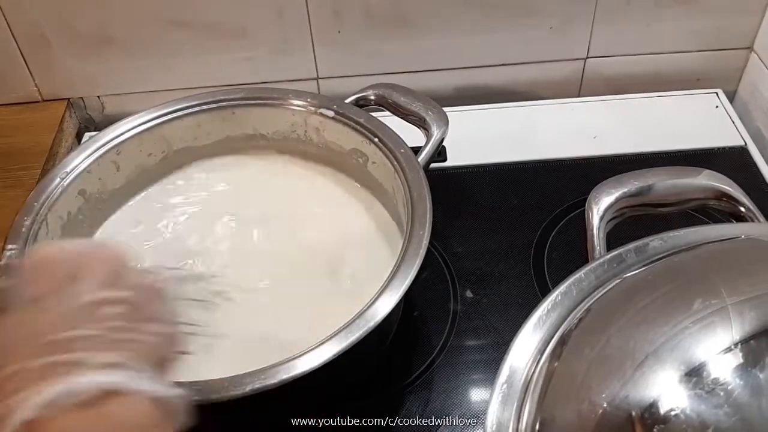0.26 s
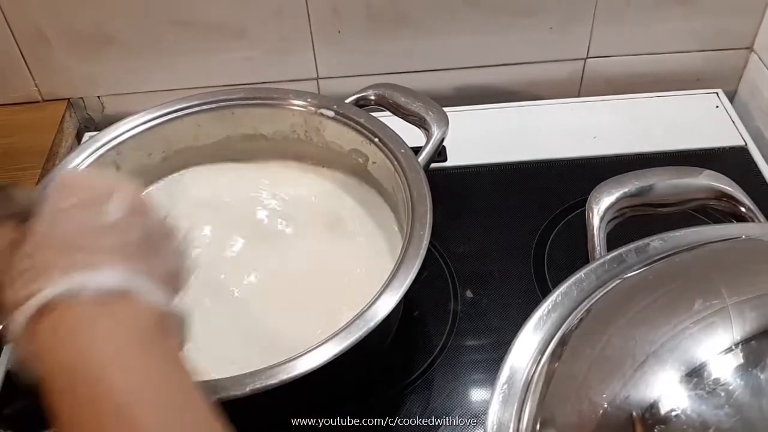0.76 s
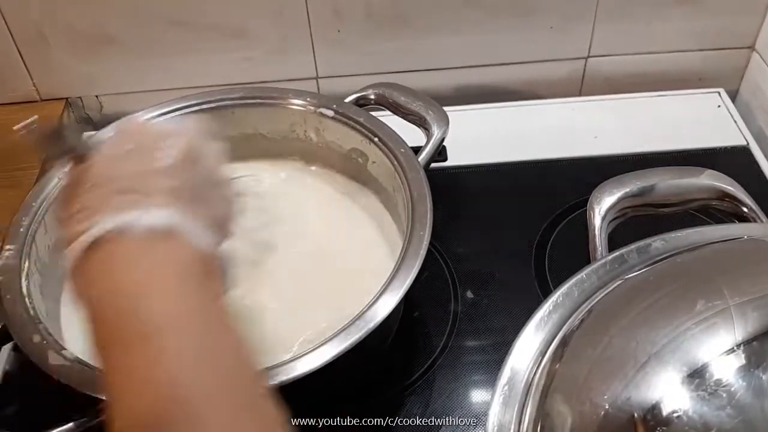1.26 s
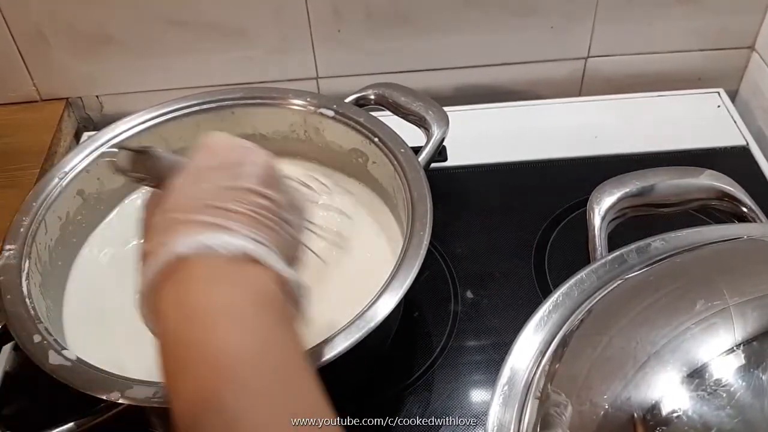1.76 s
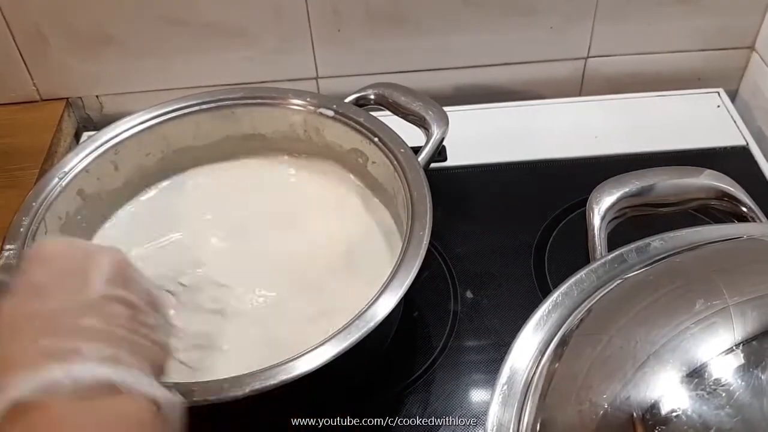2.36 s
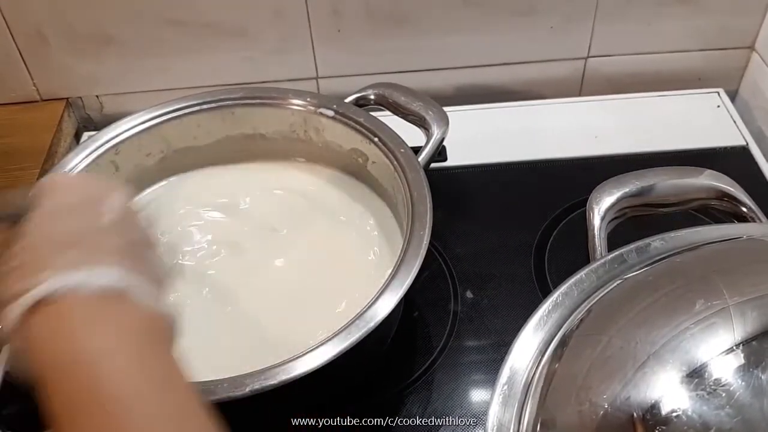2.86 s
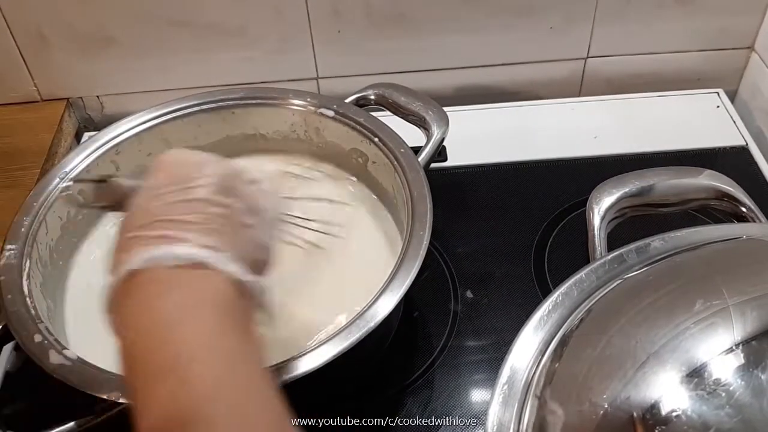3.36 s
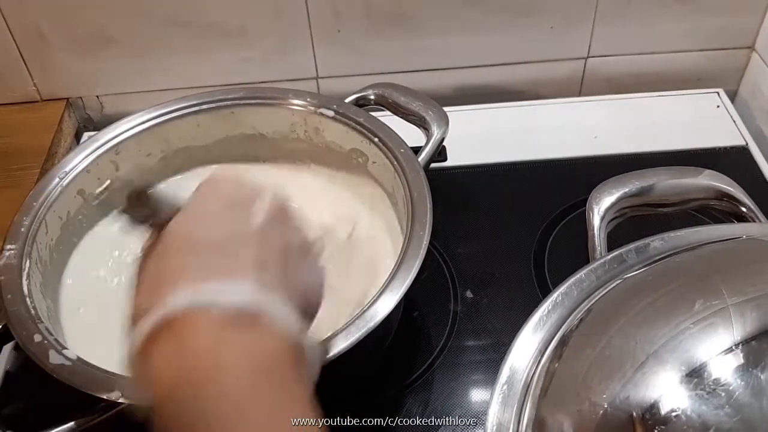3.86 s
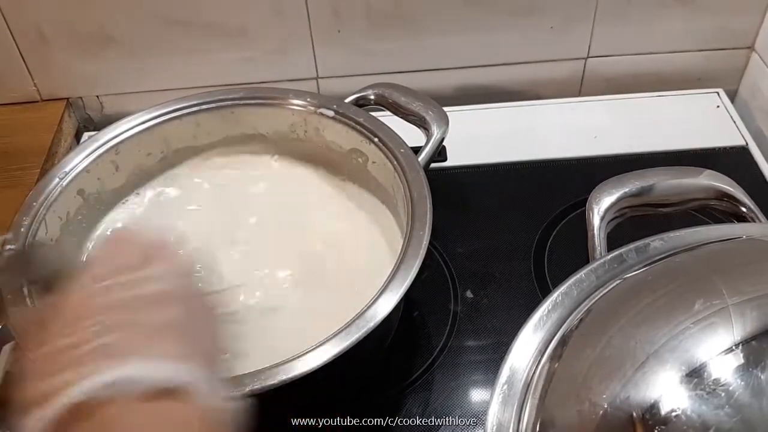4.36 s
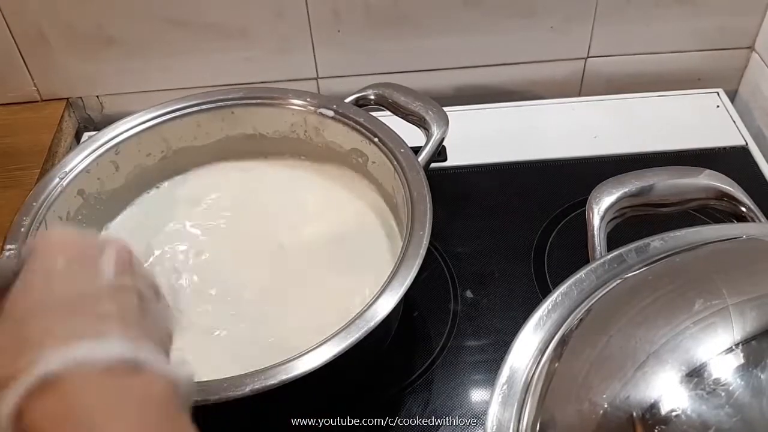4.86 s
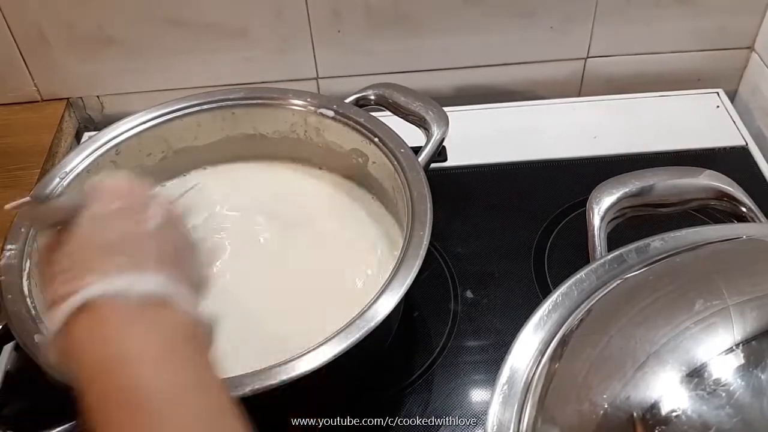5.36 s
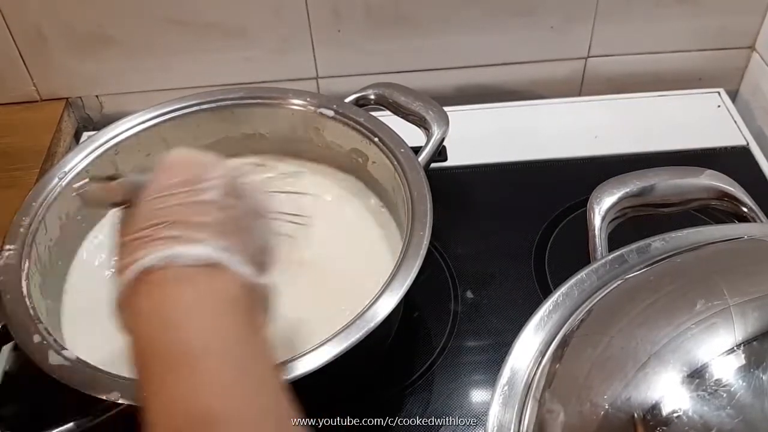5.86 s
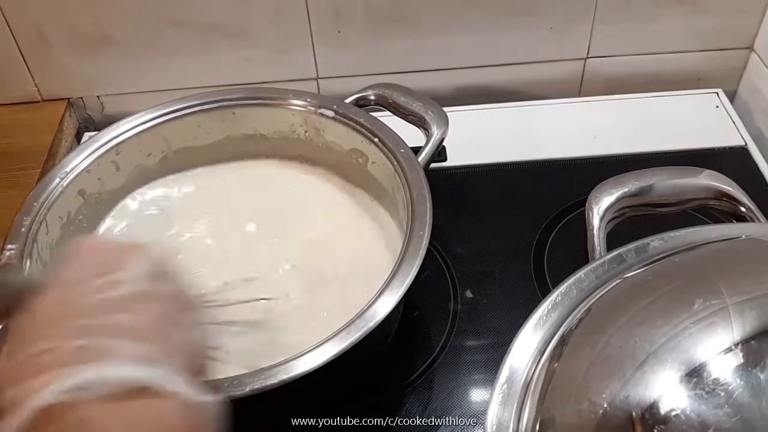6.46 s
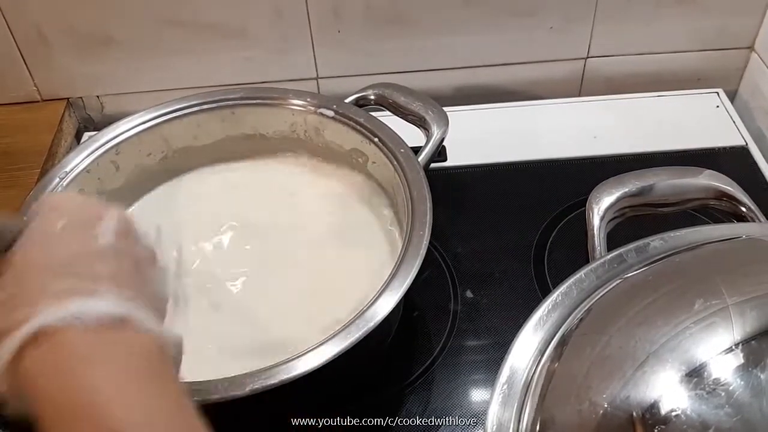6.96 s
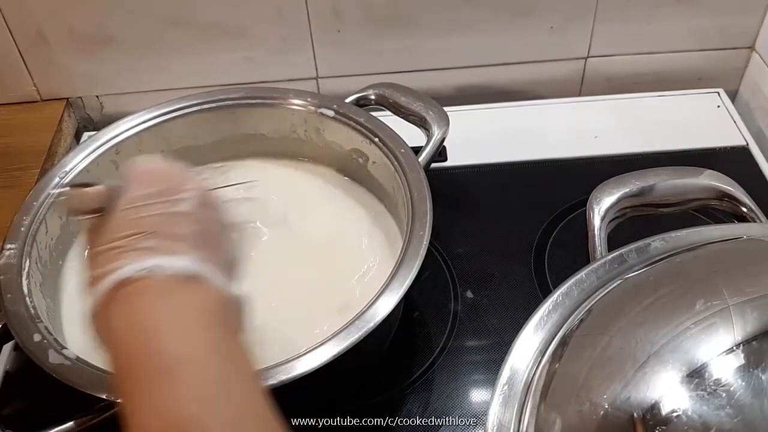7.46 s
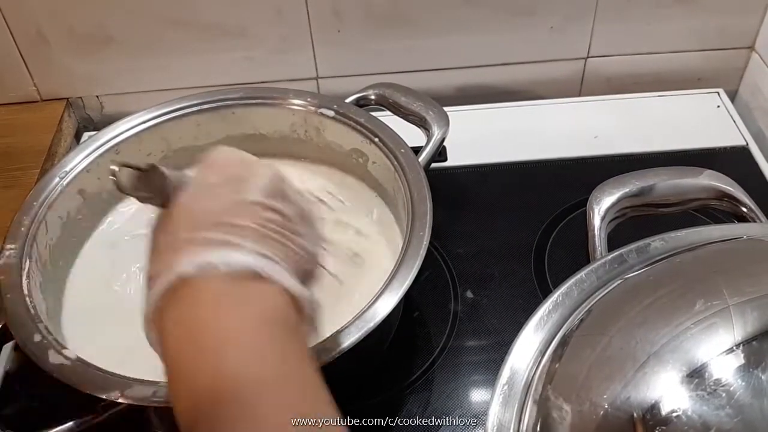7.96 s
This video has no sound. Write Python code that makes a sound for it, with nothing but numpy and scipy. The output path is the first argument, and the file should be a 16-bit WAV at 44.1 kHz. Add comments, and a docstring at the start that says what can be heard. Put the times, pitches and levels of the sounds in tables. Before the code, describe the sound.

A wire whisk circles fast in a steel pot of thick sauce, scraping with a bright metallic rasp, small squeaks, occasional clashes and wet plops.

```python
"""Kitchen hob: a wire whisk circles through thick sauce in a steel pot, about twice a second.
The wires grind along the steel (trains of slips through wire and pot modes), flick free, squeak where they
stick and slip (wavering tones), and now and then clash against the wall (bursts of strikes).
The sauce churns, plops and slaps (filtered noise grains and short tones); the hob booms now and then.
A low rumble, a hum and the reflections of the tiled corner surround it."""
import sys
import numpy as np
from scipy import signal
from scipy.fft import rfft, irfft
from scipy.io import wavfile
from scipy.ndimage import uniform_filter1d

SR = 44100
rng = np.random.default_rng(int(sys.argv[2]) if len(sys.argv) > 2 else 0)


def store_pcm(level_fs):
    """Save levels as 16-bit WAV."""
    pcm = np.round(np.clip(level_fs, -1, 1) * 32767).astype(np.int16)
    wavfile.write(sys.argv[1], SR, np.atleast_2d(pcm).T)


N = 362502
T = np.arange(N) / SR
HAND_T = T[::64]  # coarse clock for slow envelopes


def from_db(db):
    """Decibels to gain."""
    return 10 ** (np.asarray(db) / 20)


def unit(x):
    """Scales to rms 1."""
    return x / np.sqrt(np.mean(x ** 2) + 1e-20)


def read(points, hz):
    """Reads a table along a logarithmic frequency axis."""
    f, value = np.transpose(points)
    return np.interp(np.log(hz + 1), np.log(f + 1), value)


def add(mix, s, sound):
    """Mixes a sound in at time s."""
    part = mix[..., max(round(s * SR), 0):][..., :sound.shape[-1]]
    part += sound[..., :part.shape[-1]]


def through(x, response):
    """Passes a sound through an impulse response."""
    return signal.fftconvolve(np.atleast_2d(x), np.atleast_2d(response), axes=1)[:, :x.shape[-1]]


def wander(rate_hz):
    """A random curve of rms 1 through rate_hz knots a second."""
    knots = rng.standard_normal(2048)
    return unit(np.interp(T * rate_hz, np.arange(len(knots)), knots))


def click(points, modes=(), size=4096):
    """A minimum-phase click of energy 1: a broad colour with resonances on top."""
    hz = np.fft.rfftfreq(size, 1 / SR)
    power = from_db(read(points, hz)) ** 2
    for f, width, db in modes:
        power = power + from_db(db) ** 2 / (1 + ((hz - f) / width) ** 2) ** 2
    cepstrum = irfft(np.log(power) / 2)
    # folding the cepstrum makes the click causal
    cepstrum[1:size // 2] *= 2
    cepstrum[size // 2 + 1:] = 0
    response = irfft(np.exp(rfft(cepstrum)))
    return response / np.linalg.norm(response)


def slips(per_s, spread_db, size):
    """A train of tiny slips at random times, of random sign and exponentially spread level; rms 1."""
    strength = from_db(spread_db * np.minimum(rng.exponential(1, size), 4))
    sign = rng.choice([-1, 1], size)
    happens = rng.random(size) < per_s / SR
    return unit(strength * sign * happens)


def bounces(echo, span_s=.007, count=14):
    """Paths from one spot in the pot to the two channels: direct, then bounces between the steel walls."""
    paths = np.zeros((2, 1024))
    for side in paths:
        delay = rng.random(count)
        side[rng.integers(0, 16)] = 1
        at = np.minimum(16 + delay * span_s * SR, len(side) - 1).astype(int)
        side[at] += echo * rng.choice([-1, 1], count) * np.exp(-delay)
    return paths / np.linalg.norm(paths, axis=1, keepdims=True)


# Colour of the kitchen's low rumble. Each row: frequency in Hz, level in dB.
RUMBLE_COLOUR = [(20, -30), (40, -12.5), (62, -4.5), (85, 0), (115, -5.5), (160, -14.5), (215, -26),
                 (320, -15), (500, -42.5), (2000, -61), (16000, -55)]


def background():
    """Low rumble (coloured noise, partly shared by the channels) and mains hum of the kitchen."""
    air = rng.standard_normal((2, N))
    noise = through(air + 0.49 * air[::-1], click(RUMBLE_COLOUR))
    rumble = unit(noise * from_db(0.43 * wander(rate_hz=12)))
    hum = unit(np.sin(2 * np.pi * 100.5 * T + 0.33 * wander(rate_hz=4.0)))
    return from_db(-56.5) * rumble + from_db(-64.5) * hum


# Modes of the filled pot. Each row: frequency in Hz, free t60 in seconds, relative level in dB.
POT_MODES = [(1100, 0.3, 5.5), (1235, 0.19, 6), (1268, 0.4, -3.5), (1378, 0.2, 4), (1630, 0.35, 0.5),
             (1835, 0.39, 2), (1910, 0.26, 0.5), (1960, 0.17, 2), (2100, 0.25, 6), (2154, 0.34, -4),
             (2313, 0.4, 7.5), (2550, 0.23, 6.5), (2716, 0.28, 12), (3180, 0.21, 10), (3320, 0.23, 7),
             (3450, 0.12, 5), (3780, 0.11, 8.5), (3840, 0.089, 1)]
PRESSED_RING_SHARE = 0.45  # wires lying on the wall damp it: share of the free t60 left


def pot_modes(ring_share):
    """The dying wave of each pot mode; it swells while the blow travels round the wall."""
    t = np.arange(SR // 2) / SR
    swell = (1 - np.exp(-t / 0.00094)) ** 2
    waves = []
    for hz, t60, db in POT_MODES:
        decay = from_db(db - 60 * t / (t60 * ring_share)) / np.sqrt(t60)
        waves.append(decay * np.exp(2j * np.pi * hz * t))
    return swell * np.array(waves)


# Colour of a knock on the wall. Each row: frequency in Hz, level in dB.
WALL_COLOUR = [(500, -45), (640, -10), (850, -24), (1010, -13), (1110, -4.5), (1220, 0.5), (1370, -5),
               (1510, 2), (1680, 3.5), (1830, -0.5), (2200, 0.5), (2390, -36), (2650, -20), (3200, -24),
               (6000, -27)]


def pot_ring(pot, spread_db, ring_db, knock_db):
    """The pot's answer to a blow at a new spot: a knock of the wall and a fresh mix of its modes."""
    phase = np.exp(2j * np.pi * rng.random((2, len(POT_MODES))))
    left, right = phase * from_db(spread_db * rng.standard_normal(len(POT_MODES)))
    ring = (np.array([left, right - 0.35 * left]) @ pot).imag  # opposite sides swing against each other
    ring *= from_db(ring_db) * np.sqrt(2) / np.linalg.norm(ring)
    knock = through(click(WALL_COLOUR, size=2048), bounces(echo=1.0, span_s=.004))
    add(ring, 0, from_db(knock_db) * knock)
    return ring


def touch(modes, spread_db, detune):
    """Wire modes for one touch: the point of contact favours some, and bending detunes them."""
    hz, width, db = np.transpose(modes)
    pull, luck = rng.standard_normal((2, len(hz)))
    return zip(hz * (1 + detune * pull), width, db + spread_db * luck)


PUSH_POINT = 1.54  # top of a push: 1 sharp, 2 round


def push(s, rise, fall):
    """The force of one push of the whisk: it builds, peaks at time s and lets go."""
    u = HAND_T - s
    return np.exp(-np.minimum(np.abs(u / np.where(u < 0, rise, fall)) ** PUSH_POINT, 20))


# The cage pressed along the steel, several overlapping pushes a circle. Each row: time of greatest force in
# seconds, rise in seconds, fall in seconds, level in dB, bite (rasp) relative in dB, wall drone relative in dB.
SWEEPS = [(0.068, 0.26, 0.17, -30, -1.5, -21.5), (0.317, 0.052, 0.04, -26, -2.5, -28),
          (0.491, 0.23, 0.051, -28, -1.5, -18.5), (0.679, 0.16, 0.022, -32.5, 2, -17.5),
          (0.899, 0.2, 0.099, -29.5, -0.5, -17.5), (1.024, 0.047, 0.12, -38.5, 3, -32),
          (1.239, 0.2, 0.072, -38, 5.5, -10), (1.334, 0.15, 0.03, -32, -4, -24),
          (1.516, 0.061, 0.044, -33, -3, -25), (1.678, 0.091, 0.035, -33, -4, -15.5),
          (1.73, 0.11, 0.1, -30, -0.5, -21.5), (1.947, 0.12, 0.04, -30.5, -0.5, -20),
          (2.134, 0.15, 0.073, -29, -7, -23), (2.191, 0.26, 0.19, -43, 8, -10.5),
          (2.392, 0.28, 0.019, -34.5, -6.5, -18), (2.565, 0.19, 0.069, -27, -4, -20),
          (2.7, 0.054, 0.22, -31.5, 1, -16.5), (2.85, 0.072, 0.1, -30.5, 2.5, -13.5),
          (2.998, 0.043, 0.16, -32, -5, -31), (3.222, 0.29, 0.028, -48.5, 6.5, -4.5),
          (3.393, 0.045, 0.28, -43.5, 4.5, -16), (3.397, 0.13, 0.01, -28, -2, -16.5),
          (3.696, 0.087, 0.14, -28.5, -4.5, -22), (3.76, 0.054, 0.075, -39.5, 11, -8),
          (3.95, 0.041, 0.066, -37.5, 5, -8), (4.113, 0.063, 0.62, -32.5, -2, -20.5),
          (4.242, 0.022, 0.051, -37.5, 2.5, -12.5), (4.419, 0.068, 0.039, -30.5, 0, -19),
          (4.57, 0.27, 0.026, -35, -1.5, -8), (4.651, 0.088, 0.038, -32, -2, -15.5),
          (4.922, 0.29, 0.18, -33, -2.5, -18), (5.031, 0.041, 0.077, -27.5, -1.0, -15),
          (5.272, 0.3, 0.041, -32.5, -1.5, -18), (5.445, 0.18, 0.23, -30.5, -2, -20.5),
          (5.673, 0.15, 0.042, -38, 3, -13), (5.801, 0.065, 0.12, -30, -2.5, -14.5),
          (5.885, 0.093, 0.098, -32.5, -2, -22), (6.05, 0.19, 0.041, -34, -1.5, -24),
          (6.325, 0.23, 0.037, -29, -2, -21.5), (6.421, 0.08, 0.13, -34.5, -1, -24),
          (6.625, 0.12, 0.1, -29.5, 0.5, -16), (6.701, 0.032, 0.34, -32, 0, -20.5),
          (6.923, 0.055, 0.019, -43, -6.0, -6.5), (7.086, 0.15, 0.23, -29, -1, -19),
          (7.316, 0.06, 0.16, -47, -8, -2), (7.55, 0.2, 0.038, -30.5, -1.5, -25),
          (7.582, 0.025, 0.17, -36.5, 1.5, -16), (7.839, 0.13, 0.042, -29, -1, -13),
          (7.976, 0.17, 0.037, -27, -1.5, -22), (8.028, 0.12, 0.19, -35.0, -0.5, -11.5),
          (8.193, 0.03, 0.056, -31.5, -1, -22.5)]
# drag between sweeps, and gain of a 0 dB sweep, before the layer mix
DRAG_FIZZ_DB, DRAG_RASP_DB, DRAG_WALL_DB = -42, -41, -58.5
SWEEP_FIZZ_DB, SWEEP_RASP_DB, SWEEP_WALL_DB = -1, -1, 2
TREMOR_DB, TREMOR_HZ = 1.03, 22.29  # unsteady hand: rms, knots a second


def pressure():
    """Gains of fizz, rasp and wall drone: a steady drag with the sweeps on top, added as power."""
    power = from_db([[DRAG_FIZZ_DB], [DRAG_RASP_DB], [DRAG_WALL_DB]]) ** 2
    for s, rise, fall, db, bite_db, wall_db in SWEEPS:
        layers_db = [[SWEEP_FIZZ_DB], [SWEEP_RASP_DB + bite_db], [SWEEP_WALL_DB + wall_db]]
        gains = from_db(db) * from_db(layers_db)
        power = power + (gains * push(s, rise, fall)) ** 2
    tremor = from_db(TREMOR_DB * wander(rate_hz=TREMOR_HZ))
    return [tremor * np.interp(T, HAND_T, gain) for gain in np.sqrt(power)]


def twang(hz, t60):
    """A freed wire and its neighbours ring on a cluster of close modes; energy 1."""
    t = np.arange(SR // 8) / SR
    cluster = hz * (1 + .022 * rng.standard_normal(size=(5, 1)))
    tones = np.sin(2 * np.pi * (cluster * t + rng.random(cluster.shape)))
    ring = tones.sum(0) * from_db(-60 * t / t60)
    return ring / np.linalg.norm(ring)


# Bending modes of the wires. Each row: frequency in Hz, width in Hz, relative level in dB.
WIRE_LOW_MODES = [(2879, 52, 4), (3180, 35, -3), (3344, 8.3, 0), (3556, 24, 1.5), (3845, 37, 0),
                  (3900, 50, -10.5), (4670, 95, -2.5), (5125, 40, 7), (5140, 21, 1.5), (6430, 140, -1.5),
                  (6784, 180, -1.5)]
WIRE_HIGH_MODES = [(8710, 55, -4.5), (10080, 88, -2), (10900, 124, 4.5), (11860, 72, 6), (11760, 220, 3.5),
                   (13600, 160, 7.5), (13600, 140, -11), (15500, 93, -8), (15620, 70, -8)]
# Colours of one slip, fizzing and rasping. Each row: frequency in Hz, level in dB.
FIZZ_COLOUR = [(3000, -67.5), (6500, -5.5), (8000, -5.5), (10000, -2), (11500, 2), (12400, 1), (13100, -3),
               (14300, -2.5), (15000, 4), (16000, -6)]
RASP_COLOUR = [(1200, -86), (2400, -10), (2620, -5.5), (2850, -8), (3100, -2), (3500, -4), (4000, -1),
               (4300, 2), (4700, 0), (5750, 2), (6600, -5), (7600, -13), (8300, -7.5), (14000, -63.5)]
FLICKS_PER_S, FLICK_DB, FLICK_T60_S = 55, -12.5, 0.25  # level relative to the drag and sweep gains


def flicks(count=40):
    """Single wires catch and spring free: each gives a tick and a brief glint at its own pitch."""
    wires, out = WIRE_LOW_MODES + WIRE_HIGH_MODES, np.zeros((2, N))
    tick = from_db(-4.0) * click(RASP_COLOUR, size=1024) + from_db(-0.5) * click(FIZZ_COLOUR, size=1024)
    for k in range(count):
        hz, _, db = wires[k % len(wires)]
        sound = from_db(db - 1) * twang(hz, FLICK_T60_S)
        add(sound, 0, tick)
        sound = through(sound, bounces(echo=0.75))
        for when, luck in rng.random((round(FLICKS_PER_S * N / SR / count), 2)):
            add(out, when * N / SR, from_db(-9 * luck) * sound)
    return unit(out)


def scrape(pot, count=176, size=4608):
    """Wire after wire lands on the steel, grinds along for a moment and lifts off, each at a new spot."""
    fizz_gain, rasp_gain, wall_gain = pressure()
    chatter = unit(from_db(0.16 * wander(rate_hz=170)))
    fizz, rasp, wall = np.zeros((3, 2, N))
    for start in np.linspace(-size / 2, N - size / 2, count).astype(int):
        at = np.arange(max(start, 0), min(start + size, N))
        # overlapping touches share the hand's force
        force = np.sin(np.pi * (at - start) / size) * np.sqrt(2 * N / (count * size))
        grit = force * chatter[at] * slips(per_s=4200, spread_db=1.0, size=size)[:len(at)]
        grit = np.pad(grit, (0, 1024))
        landing_s = at[0] / SR
        paths = bounces(echo=0.62, span_s=.005)
        fizz_slip = click(FIZZ_COLOUR, touch(WIRE_HIGH_MODES, spread_db=0.5, detune=0.0056), size=1024)
        rasp_slip = click(RASP_COLOUR, touch(WIRE_LOW_MODES, spread_db=2.5, detune=0.0038), size=2048)
        add(fizz, landing_s, through(grit, through(fizz_slip, paths)))
        add(rasp, landing_s, through(grit, through(rasp_slip, paths)))
        # only the coarser bumps shake the wall
        bumps = force * wall_gain[at] * slips(per_s=700, spread_db=2.0, size=size)[:len(at)]
        ring = pot_ring(pot, spread_db=7.5, ring_db=-0.5, knock_db=-6.0)
        add(wall, landing_s, signal.fftconvolve(bumps[None], ring, axes=1))
    rasp *= from_db([[.6], [-.6]])
    flicking = from_db(FLICK_DB) * np.hypot(fizz_gain, rasp_gain) * flicks()
    fizzing = from_db(2.0) * fizz_gain * unit(fizz)
    rasping = from_db(-2.15) * rasp_gain * unit(rasp)
    return fizzing + rasping + wall + flicking


# Lulls: the small plops soften and the dips in the spectrum deepen. Each row: centre in seconds, length in
# seconds.
LULLS = [(0.097, 0.041), (0.52, 0.19), (0.975, 0.09), (1.3, 0.23), (1.752, 0.16), (2.15, 0.15), (2.7, 0.12),
         (3.0, 0.14), (3.297, 0.071), (3.78, 0.14), (4.2, 0.26), (4.7, 0.21), (5.038, 0.18), (5.39, 0.06),
         (5.847, 0.066), (6.287, 0.086), (6.783, 0.072), (7.1, 0.3), (7.603, 0.16), (8.053, 0.063)]


def lull_depth():
    """How deep the lull is, from 0 to 1: flat-topped bumps."""
    depth = sum(np.exp(-np.minimum((2 * (HAND_T - s) / length) ** 4, 20)) for s, length in LULLS)
    return np.interp(T, HAND_T, np.minimum(depth, 1))


PATS_PER_S, PATS_TOP_DB, PATS_RANGE_DB, LULL_QUIET_DB = 48, -57.5, 14.5, 5
PAT_PEAK_S, PAT_LOW_HZ, PAT_HIGH_HZ = 0.01, 458, 1067
PAT_CHIRP_PER_S = 0.86  # pitch is hz * (1 + 2 * chirp * t)


def pats():
    """Small pockets of air open in the tracks of the wires; each plops with a rising pitch, softer in lulls."""
    t, out = np.arange(SR // 8) / SR, np.zeros((2, N))
    swell = (t / PAT_PEAK_S) ** 2 * np.exp(2 - 2 * t / PAT_PEAK_S)
    for when, pitch, luck, side in rng.random((round(PATS_PER_S * N / SR), 4)):
        hz = PAT_LOW_HZ * (PAT_HIGH_HZ / PAT_LOW_HZ) ** pitch
        turns = hz * t * (1 + PAT_CHIRP_PER_S * t) + side * np.array([[0], [.5]])
        plop = swell * np.sin(2 * np.pi * turns)
        add(out, when * N / SR, from_db(PATS_TOP_DB - PATS_RANGE_DB * luck) * plop)
    return from_db(-LULL_QUIET_DB * lull_depth()) * out


# Share of the mottle swing along the spectrum. Each row: frequency in Hz, share.
MOTTLE_SHARE = [(600, .6), (1300, 1.1), (3000, 1), (4500, .8), (7000, .5), (12000, .25)]
MOTTLE_DB, MOTTLE_HZ, MOTTLE_S = 2.7, 90, .055  # swing, smoothing width, smoothing time


def mottle(hz, frames, frame_s):
    """Narrow, shifting peaks and gaps in the spectrum, as a cut in dB from smoothed noise."""
    field = rng.standard_normal((frames, len(hz))).T
    for _ in range(2):
        field = uniform_filter1d(field, round(MOTTLE_HZ / hz[1]), axis=0)
        field = uniform_filter1d(field, round(MOTTLE_S / frame_s), axis=1)
    field = unit(field)
    # gaps go twice as deep as peaks rise
    cut_db = MOTTLE_DB * read(MOTTLE_SHARE, hz)[:, None] * (field + np.maximum(field, 0))
    # the mean power is kept
    return cut_db + 10 * np.log10(np.mean(from_db(-cut_db) ** 2, axis=1, keepdims=True))


# Bands that thin out and return. Each row: frequency in Hz, width in Hz, typical depth in dB, extra depth in
# a lull in dB.
DIPS = [(860, 135, 6, 20), (1520, 80, 14, 14), (2400, 90, 14, 12), (3130, 75, 10, 4), (4360, 110, 8, 3),
        (5760, 160, 7, 2), (8200, 180, 5, 0), (12600, 180, 4, 0), (14350, 180, 4, 0)]
DIP_RATE_HZ, DIP_DRIFT_WIDTHS, DIP_SWING_SHARE = 8, .45, .9


def spectral_dips(x):
    """Drifting dips in the spectrum of the scrape and pats: narrow bands that thin out and return."""
    hz, t, z = signal.stft(x, SR, nperseg=1024, noverlap=768)
    cut_db = mottle(hz, len(t), t[1])
    lull = np.interp(t, T, lull_depth())
    for centre, width, depth_db, lull_db in DIPS:
        drift, depth = (np.interp(t, T, wander(rate_hz=DIP_RATE_HZ)) for _ in range(2))
        away = ((hz[:, None] - centre - DIP_DRIFT_WIDTHS * width * drift) / width) ** 2
        dip_db = depth_db * np.maximum(1 + DIP_SWING_SHARE * depth, 0) + lull_db * lull
        cut_db += dip_db / (1 + away * away * away)
    return signal.istft(z * from_db(-cut_db), SR, nperseg=1024, noverlap=768)[1][:, :N]


# The sauce heaves when the whisk digs in. Each row: peak time in seconds, length in seconds, level in dB.
HEAVES = [(0.398, 0.099, -52), (0.496, 0.059, -62), (0.68, 0.05, -61), (0.9, 0.06, -51.5),
          (1.16, 0.17, -53), (1.32, 0.086, -54), (1.5, 0.08, -55), (1.693, 0.12, -56), (1.97, 0.06, -61),
          (2.223, 0.18, -65), (2.593, 0.34, -52), (2.73, 0.06, -56), (2.878, 0.08, -53.5), (3.4, 0.06, -56),
          (3.72, 0.063, -67), (4.162, 0.07, -64), (4.448, 0.1, -50), (4.55, 0.08, -48), (4.658, 0.05, -55),
          (4.852, 0.06, -60), (5.057, 0.16, -54.5), (5.227, 0.11, -57), (5.473, 0.16, -61),
          (5.756, 0.059, -54.5), (5.91, 0.052, -56), (6.153, 0.072, -52.5), (6.3, 0.052, -52),
          (6.63, 0.16, -51.5), (6.77, 0.06, -61), (6.94, 0.06, -58), (7.095, 0.13, -50),
          (7.323, 0.041, -60), (7.494, 0.067, -65), (7.742, 0.046, -44), (7.863, 0.11, -47.5),
          (7.965, 0.074, -54.5), (8.148, 0.12, -54)]
# Colour of the sauce. Each row: frequency in Hz, level in dB.
SAUCE_COLOUR = [(50, -25.5), (110, 5.5), (180, 5.5), (228, -14.5), (275, 6), (330, 1), (400, 2),
                (480, -24.5), (600, -39), (1500, -50), (4000, -74)]
# Low modes of the full pot on the hob. Each row: frequency in Hz, width in Hz, level in dB.
BODY_MODES = [(176.6, 8.3, 9), (197.6, 8, 7), (273.4, 8, 12.5), (335.6, 11, 6), (386.5, 11.7, 5.5)]
CHURN_DB, CHURN_SWING_DB = -60.5, 1.5


def churn():
    """Thick sauce churns behind the wires and heaves when they dig in: grains through the pot's low modes."""
    stirring = from_db(CHURN_DB + CHURN_SWING_DB * wander(rate_hz=13))
    heaving = sum((from_db(db) * push(s, length / 2, length / 2)) ** 2 for s, length, db in HEAVES)
    gain = np.sqrt(stirring ** 2 + np.interp(T, HAND_T, heaving))
    lumps = np.array([slips(per_s=490, spread_db=2.0, size=N) for _ in range(2)])
    colour = click(SAUCE_COLOUR, BODY_MODES, size=16384)
    return gain * unit(through(lumps + 0.31 * lumps[::-1], colour))


# A wire sticks and slips on one bending mode. Each row: start in seconds, length in seconds, pitch in Hz,
# relative level in dB.
SQUEAKS = [(0.226, 0.02, 2860, -35.5), (0.331, 0.03, 3670, -29), (0.336, 0.04, 3370, -27),
           (0.6, 0.03, 5220, -40), (0.672, 0.03, 5070, -33.5), (0.849, 0.021, 5100, -25),
           (0.857, 0.067, 3440, -25.5), (0.859, 0.034, 3770, -25), (0.879, 0.035, 3290, -31),
           (1.03, 0.076, 5120, -39), (1.235, 0.04, 2800, -37), (1.235, 0.08, 5260, -38),
           (1.462, 0.017, 5170, -25), (1.649, 0.02, 5140, -29), (1.657, 0.032, 5280, -30),
           (1.86, 0.035, 5130, -33), (1.937, 0.052, 5130, -27), (3.14, 0.027, 5130, -28),
           (3.17, 0.06, 5110, -39), (3.915, 0.035, 5140, -35), (4.138, 0.034, 15600, -30),
           (4.335, 0.021, 5200, -37), (4.398, 0.032, 5270, -25), (4.755, 0.045, 5120, -38),
           (5.428, 0.025, 15590, -30), (5.61, 0.037, 5200, -35), (5.838, 0.022, 15400, -21),
           (6.03, 0.053, 5240, -32), (6.435, 0.04, 5250, -36), (6.508, 0.03, 2860, -28),
           (6.606, 0.027, 2840, -33.5), (6.85, 0.05, 5180, -35), (7.27, 0.05, 5200, -30.5),
           (7.482, 0.038, 15500, -13), (7.832, 0.022, 2850, -35), (8.075, 0.022, 5150, -32),
           (8.115, 0.037, 5200, -26)]
SQUEAK_WAVER_HZ, SQUEAK_RELEASE_S = 18, .01  # rms, time constant


def squeaks():
    """A sticking wire locks onto one mode, sings with a wavering pitch and lets go."""
    out = np.zeros((2, N))
    for s, length, hz, db in SQUEAKS:
        t = np.arange(int((length + 0.17) * SR)) / SR
        waver, flutter = (unit(uniform_filter1d(rng.standard_normal(len(t)), size=200)) for _ in range(2))
        release = np.exp(-np.maximum(t - 0.75 * length, 0) / SQUEAK_RELEASE_S)
        swell = np.minimum(t / 0.0061, 1) * release
        turns = np.cumsum(hz + SQUEAK_WAVER_HZ * waver) / SR
        tone = swell * from_db(0.54 * flutter) * np.sin(2 * np.pi * turns)
        # the right channel lags by a few samples
        add(out, s, from_db(db - 1) * np.array([tone, np.roll(tone, rng.integers(1, 9))]))
    return out


# Sauce slaps shut behind the wires. Each row: time in seconds, length in seconds, relative level in dB,
# pitch of the trapped air in Hz.
SLAPS = [(0.33, 0.048, -53, 714), (0.364, 0.037, -42, 850), (0.695, 0.036, -49, 980),
         (0.888, 0.061, -53.5, 650), (1.118, 0.19, -59, 630), (1.54, 0.12, -58, 880),
         (1.969, 0.018, -45, 840), (2.838, 0.048, -42.5, 757), (2.925, 0.13, -57.5, 570),
         (3.164, 0.042, -60, 750), (3.379, 0.052, -53, 1060), (3.988, 0.087, -52, 940),
         (4.462, 0.33, -64, 696), (5.197, 0.028, -51, 860), (5.288, 0.046, -44, 990),
         (5.482, 0.098, -51, 875), (5.673, 0.063, -47, 960), (6.538, 0.064, -44, 945),
         (6.618, 0.041, -50, 690), (7.119, 0.043, -55, 596), (7.758, 0.049, -48, 915),
         (7.85, 0.06, -56, 670)]
# Colour of a wet pat of sauce. Each row: frequency in Hz, level in dB.
SLAP_COLOUR = [(300, -35), (480, -41), (550, -26), (680, 8.5), (740, -38), (850, -31), (950, 14),
               (1100, -1), (1500, -39), (4000, -56)]


def slaps():
    """Sauce closes over the tracks of the wires: each burst of drops rings a pocket of air."""
    out = np.zeros((2, N))
    for s, length, db, hz in SLAPS:
        t = np.arange(-SR // 6, SR // 6) / SR
        drops = np.array([slips(per_s=760, spread_db=-1.0, size=len(t)) for _ in range(2)])
        pocket = click(SLAP_COLOUR, [(hz, 55, 16)])
        add(out, s - .17, from_db(db - 5.5) * through(drops * np.exp(-2 * (t / length) ** 2), pocket))
    return out * from_db([[1.8], [-1.8]])


# Wires clash on the wall. Each row: start in seconds, relative level in dB, then relative to that: thud in
# dB, wall clank in dB, fizz in dB; wall pitch in Hz, wire pitch in Hz, rattle time constant in seconds,
# after-ring level in dB.
CLASHES = [(0.344, -9, -49, -28, -36, 1580, 3590, 0.019, -50),
           (0.849, -20.5, -48, -17, -7.5, 1900, 5260, 0.021, -62),
           (0.866, -18.5, -51, -28, -34, 1900, 3510, 0.034, -61),
           (1.532, -34, -35, -4, -25, 1470, 2700, 0.024, -60),
           (2.543, -14, -49, -25.5, -27, 1120, 5950, 0.048, -46),
           (2.805, -3.5, -33.5, -20, -16.5, 2320, 6930, 0.011, -38.5),
           (2.816, -8, -28, -28, -34, 1100, 4860, 0.015, -43),
           (2.832, -15.5, -26, -16, -25, 2430, 2790, 0.014, -47),
           (3.39, -18.5, -39, -17.5, -19, 1240, 5100, 0.02, -54.5),
           (3.7485, -14, -53, -29, -16.5, 1630, 5100, 0.018, -50),
           (4.372, -22, -43.5, -23, -43, 1800, 4000, 0.02, -60),
           (4.3971, -10.5, -38, -10, -13, 1400, 5200, 0.0095, -48),
           (4.409, -14.5, -33, -13.5, -11.5, 1700, 5300, 0.017, -38),
           (4.425, -21, -34, -2, -20, 1200, 3980, 0.028, -42.5),
           (5.058, -19, -50, -8, -23, 2180, 3980, 0.0061, -52),
           (5.437, -15, -32, -19, -12, 1700, 4020, 0.03, -56),
           (5.469, -16.5, -34, -24, -15, 1800, 4720, 0.013, -47),
           (6.506, -9.5, -25, -16, -13, 1980, 3850, 0.014, -56),
           (6.5128, -12, -31, -26, -19, 1230, 2870, 0.014, -54),
           (7.084, -21.5, -40, -13.5, -6.5, 1330, 3420, 0.046, -51),
           (7.7196, -8, -27, -21.5, -16.5, 1920, 7300, 0.017, -51)]
# Colour of the thud of the pot on the hob. Each row: frequency in Hz, level in dB.
THUD_COLOUR = [(30, -19), (70, 0), (170, 10), (230, -1), (350, 7), (550, -2), (850, 0.5), (2500, -8),
               (8000, -51)]
CLASH_RISE_S = 0.00022  # the cage flattens on the wall
TWANG_DB, TWANG_T60_S = -18, 0.052  # hardest-hit wire
WALL_LAG_S = .004  # bending waves arrive after the strike


def clashes(pot):
    """The cage meets the wall: wire after wire strikes within a few hundredths of a second."""
    t = np.arange(SR // 2) / SR
    out = np.zeros((2, N))
    for s, db, thud_db, wall_db, fizz_db, wall_hz, wire_hz, length, _ in CLASHES:
        envelope = np.exp(-t / length) * (1 - np.exp(-t / CLASH_RISE_S))
        strikes = slips(per_s=1800, spread_db=-0.5, size=len(t)) * envelope
        strikes *= np.sqrt(length * SR / 2) / (np.linalg.norm(strikes) + 1e-9)
        crack = from_db(-11.5) * click(RASP_COLOUR, [(wire_hz, 380, 5)])
        fizz = click(FIZZ_COLOUR, touch(WIRE_HIGH_MODES, spread_db=14.0, detune=0.039))
        crack += from_db(fizz_db + 6.5) * fizz
        add(crack, 0, from_db(TWANG_DB) * twang(wire_hz, TWANG_T60_S))
        add(out, s, from_db(db) * through(strikes, through(crack, bounces(echo=0.57))))
        # the struck patch of wall clanks at its own pitch
        wall = pot_ring(pot, spread_db=4.0, ring_db=-8.0, knock_db=-19.0)
        patch = through(click(WALL_COLOUR, [(wall_hz, 90, 13)]), bounces(echo=1.0))
        add(wall, 0, from_db(-6.0) * patch)
        add(out, s + WALL_LAG_S, from_db(db + wall_db - 2.0) * through(strikes, wall))
        add(out, s, from_db(db + thud_db - 5.0) * through(strikes, click(THUD_COLOUR)))
    return out


AFTER_RING_SLOPE_DB_PER_OCTAVE, AFTER_RING_RISE_S = 19, .008


def after_rings(pot):
    """Once the cage has bounced off, the wall rings freely, strongest near the struck patch's pitch."""
    out, hz = np.zeros((2, N)), np.transpose(POT_MODES)[0]
    swell = 1 - np.exp(-T[:pot.shape[1]] / AFTER_RING_RISE_S)
    for s, *_, wall_hz, _, _, db in CLASHES:
        weight = from_db(-AFTER_RING_SLOPE_DB_PER_OCTAVE * np.abs(np.log2(hz / wall_hz)))
        phase, lead = rng.random((2, len(POT_MODES)))
        turns = np.array([phase, phase + .15 + .2 * lead])
        ring = swell * ((weight * np.exp(2j * np.pi * turns)) @ pot).imag
        add(out, s + WALL_LAG_S, from_db(db) * ring / ring[:, :SR // 20].std())
    return out


# A hard shove rocks the pot. Each row: peak time in seconds, length in seconds, level in dB.
BOOMS = [(2.88, 0.07, -48.5), (3.04, 0.068, -50.5), (4.47, 0.13, -48), (7.88, 0.089, -61)]
HOB_HZ, HOB_WAVER_HZ = 98, 8.7  # lowest mode, rms waver


def booms():
    """The hob gives a short, deep boom under the rocking pot: a wavering sine on its lowest mode."""
    gain = sum(from_db(db) * push(s, length / 2, length / 2) for s, length, db in BOOMS)
    hz = HOB_HZ + HOB_WAVER_HZ * wander(rate_hz=40)
    return np.interp(T, HAND_T, gain) * unit(np.sin(2 * np.pi * np.cumsum(hz) / SR))


# Ring of the kitchen. Each row: frequency in Hz, t60 in seconds.
KITCHEN_T60 = [(100, 0.28), (1000, 0.032), (4000, 0.17), (15000, 0.047)]


def kitchen(x):
    """Sparse reflections from tiles and cupboards; each band dies at its own rate."""
    taps = rng.choice([-1, 1], (2, SR // 2)) * (rng.random((2, SR // 2)) < 3000 / SR)
    taps[:, :round(.006 * SR)] = 0
    hz, t, z = signal.stft(taps, SR, nperseg=256)
    decay = from_db(-60 * t / read(KITCHEN_T60, hz)[:, None])
    tail = signal.istft(z * decay, SR, nperseg=256)[1]
    return through(x, tail / np.linalg.norm(tail[0]))


def scene():
    """Whisk, pot and sauce in the tiled corner."""
    pressed = pot_modes(PRESSED_RING_SHARE)[:, :SR // 6]
    stirring = spectral_dips(scrape(pressed) + pats())
    sauce = churn() + slaps()
    whisk = stirring + sauce + squeaks() + clashes(pressed) + after_rings(pot_modes(1)) + booms()
    return whisk + from_db(-13.0) * kitchen(whisk) + background()


EDGE_HZ = 15790


def record(dry):
    """Band limit: a steep linear-phase low-pass."""
    lowpass = signal.firwin(1023, EDGE_HZ, window=("kaiser", 9), fs=SR)
    return signal.oaconvolve(dry, lowpass[None], "same")


dry = scene()
out = record(dry)
store_pcm(out)
```